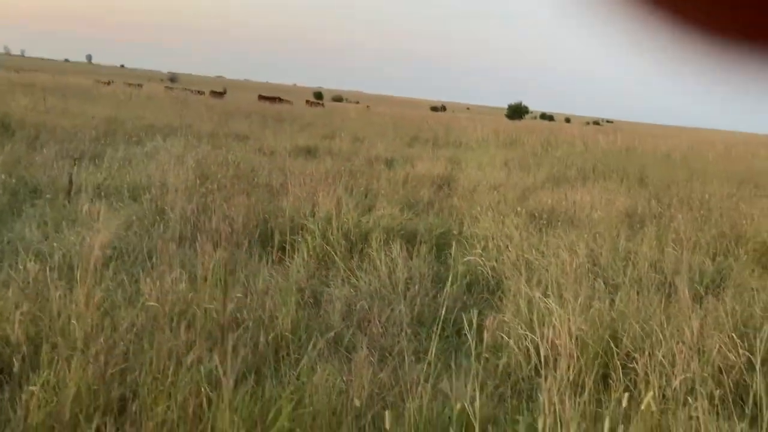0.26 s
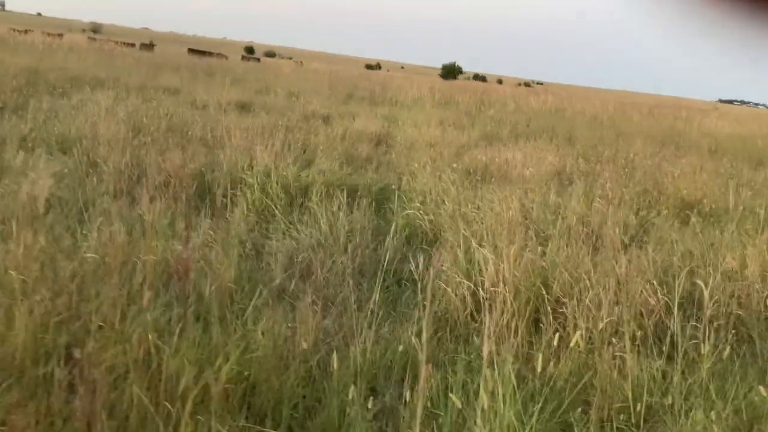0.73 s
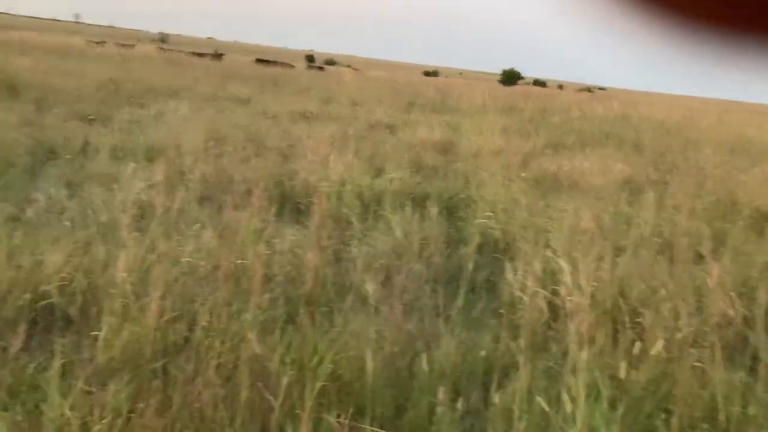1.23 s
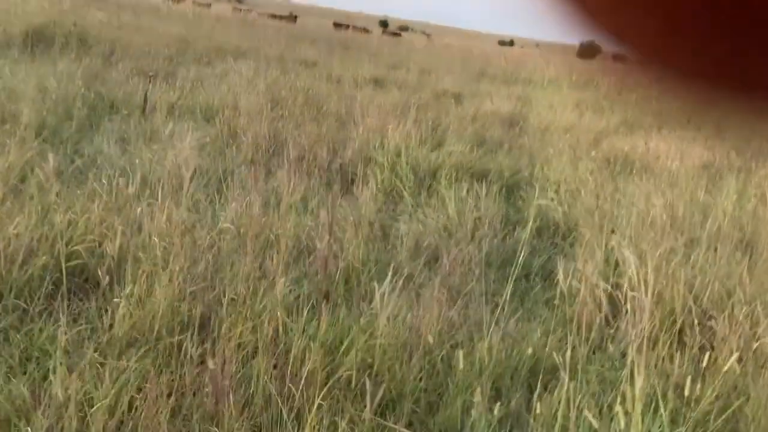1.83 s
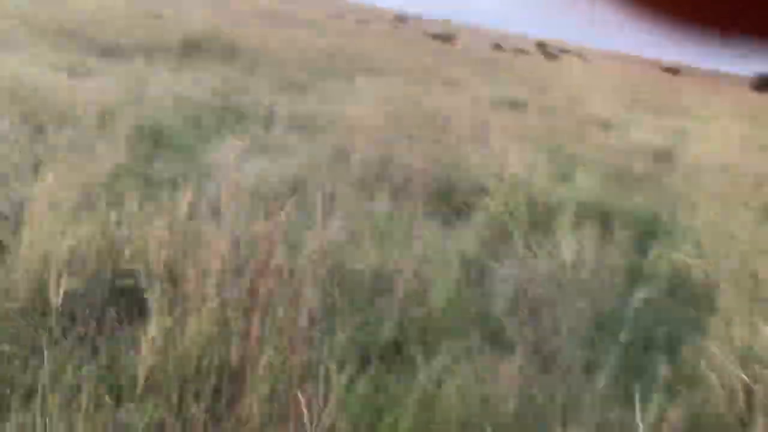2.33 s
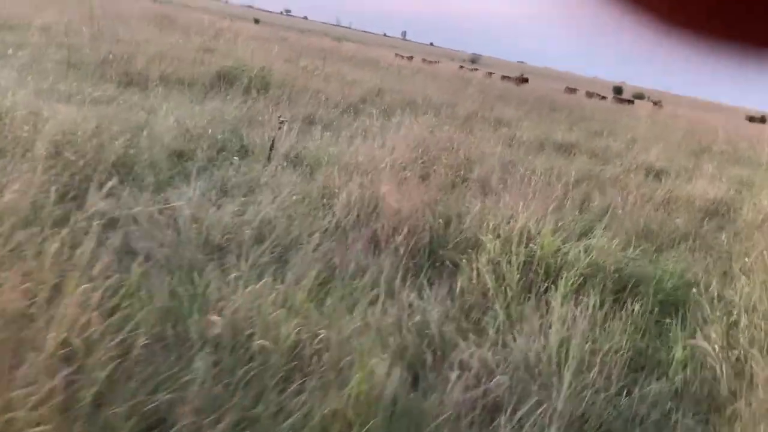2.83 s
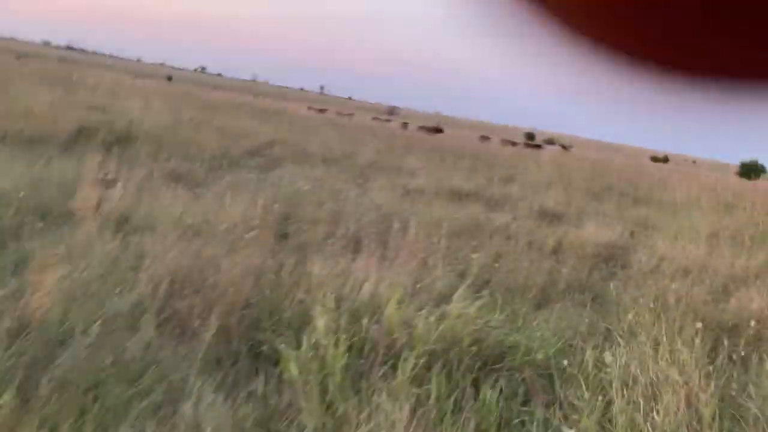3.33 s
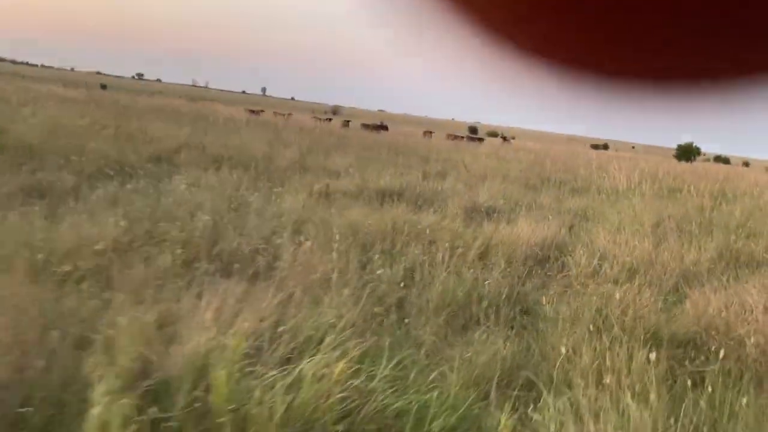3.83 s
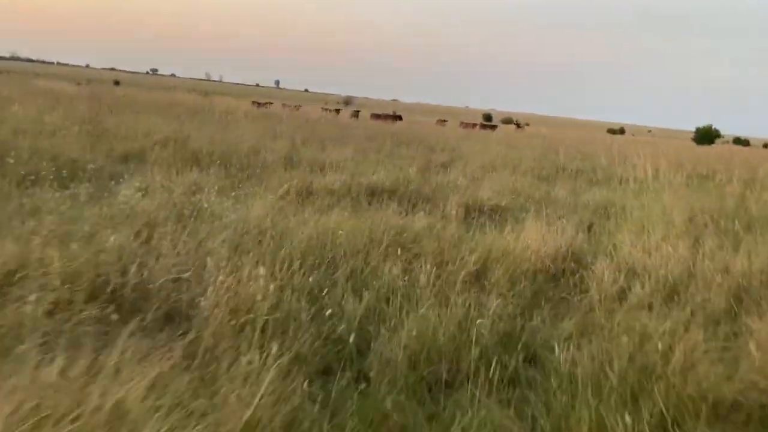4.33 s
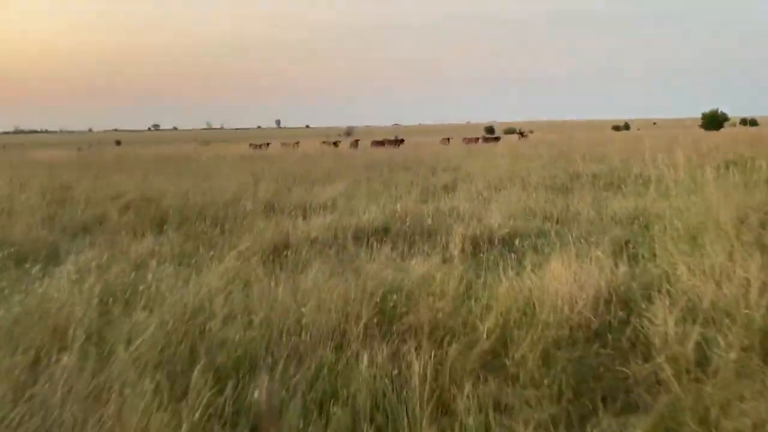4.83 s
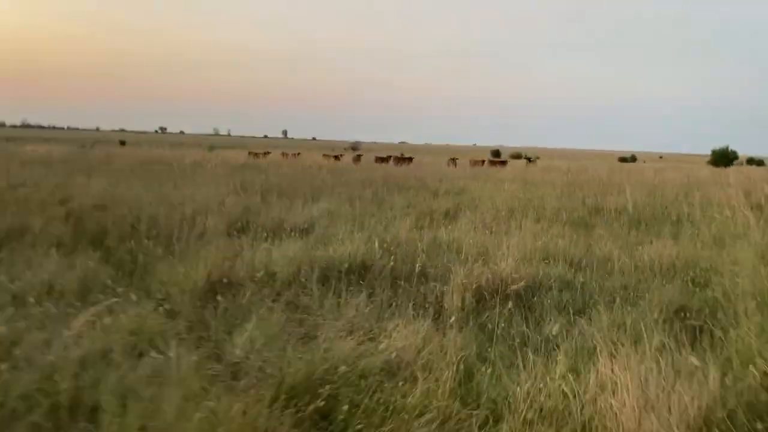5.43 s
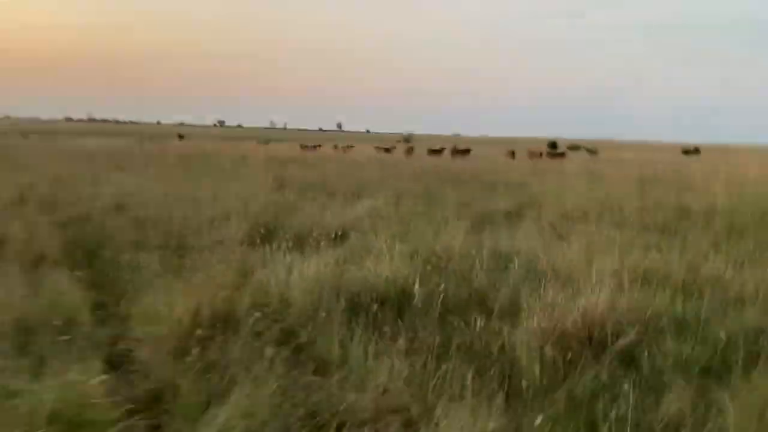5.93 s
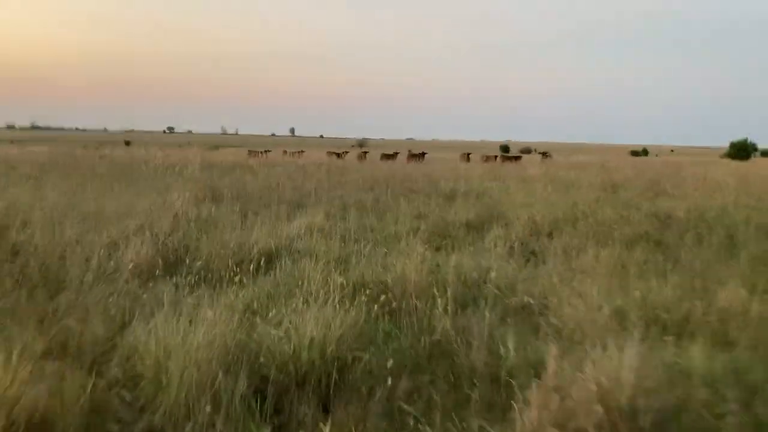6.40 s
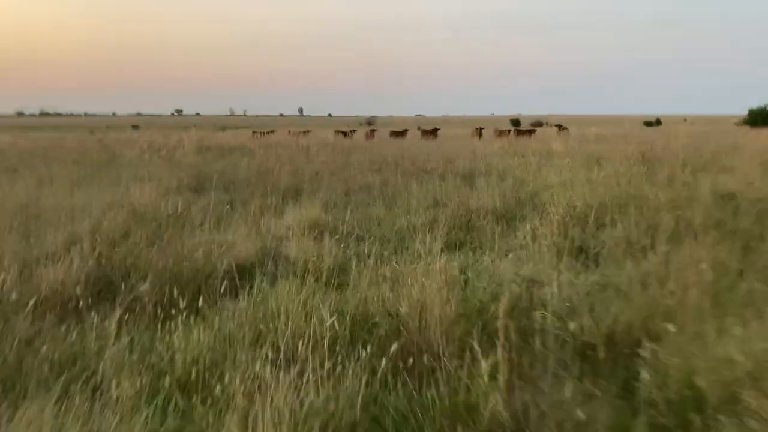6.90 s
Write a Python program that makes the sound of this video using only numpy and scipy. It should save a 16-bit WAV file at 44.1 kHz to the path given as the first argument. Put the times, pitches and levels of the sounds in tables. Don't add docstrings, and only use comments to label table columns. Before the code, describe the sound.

Close, chugging small engine revs and drives across rough pasture, with clattering metal, dry grass brushing the body, heavy jolts and bumping wind.

```python
import sys
import numpy as np
from scipy import signal
from scipy.fft import rfft, irfft, next_fast_len
from scipy.io import wavfile
from scipy.ndimage import uniform_filter1d

SR = 44100
rng = np.random.default_rng(int(sys.argv[2]) if len(sys.argv) > 2 else 0)


def dump_mix(stems):
    frames = np.atleast_2d(stems).T
    limited = np.clip(frames, -1, 1)
    pcm = np.round(limited * 32767).astype(np.int16)
    wavfile.write(sys.argv[1], SR, pcm)


def undo_db(level):
    steps = np.asarray(level, float) / 20
    return 10 ** steps


N = 315756

TIME = np.arange(N) / SR
SIZE = next_fast_len(N)
FREQ = np.fft.rfftfreq(SIZE, 1 / SR)
MID_REVS_HZ = 23
LEAD = np.exp(2j * np.pi * np.maximum(FREQ - 2640, 0) / 4400)


def unit(x):
    return x / np.sqrt(np.mean(x ** 2))


def curves(table):
    s, *columns = np.transpose(table)
    return [np.interp(TIME, s, c) for c in columns]


def across(table):
    hz, value = np.transpose(table)
    return np.interp(np.log(FREQ + 1), np.log(hz + 1), value)


def colour(x, gain):
    return irfft(rfft(x, SIZE) * gain, SIZE)[:N]


def shaped(x, table):
    return unit(colour(x, undo_db(across(table))))


def ring(x, hz, sharpness):
    return signal.lfilter(*signal.iirpeak(hz, sharpness, SR), x)


def bump(middle_s, half_s):
    return np.exp(-((TIME - middle_s) / half_s) ** 2)


def walk(rate):
    k = int(SR / rate)
    held = np.repeat(rng.standard_normal(N // k + 1), k)
    return unit(uniform_filter1d(uniform_filter1d(held, k), k)[:N])


def strokes(turns, early_s, scatter_db, jitter_s):
    cycle = np.arange(int(turns[-1]) + 2)
    size_chance, time_chance = rng.standard_normal((2, len(cycle)))
    at_s = np.interp(cycle, turns, TIME, left=-1, right=-1) - early_s + jitter_s * time_chance
    at = at_s * SR
    heard = (at > 0) & (at < N - 1)
    x = np.zeros(N)
    x[at[heard].astype(int)] = undo_db(scatter_db * size_chance[heard])
    return x


def ports(mono, other):
    # frequency in Hz, share of the sound common to both ports 0-1.
    likeness = [(300, 0.5), (900, 0.87), (1500, 0.54), (2400, 0.15), (5500, .6), (6800, .9), (9000, 1)]
    # frequency in Hz, left minus right in dB.
    balance = [(60, -1.5), (110, -1.5), (200, -11.5), (380, 6.5), (700, -2), (1290, 2), (2380, 2),
               (4400, 3.5), (8120, 0.5), (15000, -1)]
    like = np.clip(across(likeness), 0, 1)
    tilt = undo_db(across(balance) / 2)
    right = colour(mono, like * LEAD / tilt) + colour(other, np.sqrt(1 - like ** 2) / tilt)
    return np.array([colour(mono, tilt), right])


def wind(speed):
    # start in seconds, hold in seconds, level in dB.
    gusts = [(.22, .02, -32), (1.27, 0.017, -27.5), (1.584, 0.86, -28.5), (2.844, 0.055, -26),
             (3.089, 0.025, -26.5), (3.946, 0.021, -24), (4.685, .01, -25), (4.86, .02, -24),
             (4.913, 2.5, -27.5), (5.072, .012, -21.5), (5.143, 0.027, -18.5), (6.753, 0.065, -23.5),
             (6.904, .01, -24), (7.054, .01, -24.5)]
    # frequency in Hz, level in dB.
    buffet = [(20, -26), (40, -1), (100, 6), (200, 2), (400, 0.5), (700, -59)]
    rise_db_s, fall_db_s = 170, 190
    db = -54 + 5 * speed
    for s, hold_s, peak_db in gusts:
        before_s = np.maximum(s - TIME, 0)
        after_s = np.maximum(TIME - s - hold_s, 0)
        db = np.maximum(db, peak_db - rise_db_s * before_s - fall_db_s * after_s)
    eddies = [shaped(rng.standard_normal(N), buffet) * undo_db(1.5 * walk(30)) for _ in range(3)]
    rumble = 1 / (1 + (FREQ / 140) ** 4)
    upper = undo_db(1.3 * np.minimum(db + 22.5, 0))
    common, left, right = [colour(e, rumble) + upper * colour(e, 1 - rumble) for e in eddies]
    level = undo_db(-32.5 + 1.69 * (db + 31.5))
    return level * np.array([common + 0.61 * left, common + 1.17 * right])


def thicket():
    # frequency in Hz, level in dB.
    stem_colour = [(600, -30), (1100, -2), (1500, 6.5), (2600, -4), (3300, -13), (6000, -29)]
    swell = undo_db(-29.5) * bump(2.8, 0.45)
    stems = [rng.standard_normal(N) * undo_db(1.1 * walk(120)) for _ in range(2)]
    return ports(*[shaped(s, stem_colour) * swell for s in stems])


def grass(speed, turns):
    # frequency in Hz, level in dB.
    stalk_colour = [(2500, -53), (4000, 6), (5600, -5.5), (6800, -7), (9000, 1), (12000, -1.5),
                    (15000, -3.5), (15900, -9), (16100, -70)]
    # frequency in Hz, level in dB.
    seed_colour = [(9000, -26), (12000, -6), (14500, -1.5), (15900, -1), (16100, -60)]
    # middle in seconds, half length in seconds, extra level in dB.
    patches = [
        (2.65, 0.68, 25),
        (3.65, .3, 12),
        (4.5, 0.14, 18),
        (6.137, 0.4, 16),
    ]
    seed_db = -68.5 - 2 * speed
    for middle_s, half_s, extra_db in patches:
        seed_db = seed_db + extra_db * bump(middle_s, half_s)
    brush = undo_db(-49 + 4.5 * speed + 1.75 * walk(11))
    sides = []
    for _ in range(2):
        struck = rng.random(N) < 900 / SR
        ticks = struck * rng.standard_normal(N) * undo_db(5.0 * rng.exponential(size=N))
        sheet = rng.standard_normal(N) + 0.15 * unit(ticks)
        sides.append(shaped(sheet, stalk_colour) * brush + shaped(sheet, seed_colour) * undo_db(seed_db))
    throb = undo_db(0.84 * np.cos(2 * np.pi * (turns - .45)))
    return throb * ports(*sides)


def slaps(table, pan_db, sharpness, length_s, rise, strike):
    out = np.zeros((2, N))
    t = np.arange(int(.12 * SR)) / SR
    shape = np.minimum(t / (rise * length_s), 1) * np.exp(-t / length_s)
    bright_band = signal.butter(2, [3500, 15500], "band", fs=SR)
    for s, db, hz, bright_db in table:
        noise = rng.standard_normal((2, len(t))) * shape
        noise[:, int(rise * length_s * SR)] += strike
        tone = ring(noise, hz, sharpness)
        crack = signal.lfilter(*bright_band, noise)
        hit = tone / np.abs(tone).max() + undo_db(bright_db) * crack / np.abs(crack).max()
        hit[1] = .85 * hit[0] + .5 * hit[1]
        i = int(s * SR)
        out[:, i:i + len(t)] += hit * undo_db(db + np.array([[1], [-1]]) * pan_db[i] / 2)
    return np.array([out[0], colour(out[1], LEAD)])


def stalks_on_body(pan_db):
    # start in seconds, peak in dB, panel ring in Hz, brightness in dB.
    snaps = [(1.0164, -11, 2450, -16), (1.207, -20, 890, -14), (1.253, -14, 1850, -19),
             (1.307, -19, 1630, -21), (1.437, -21, 730, -20), (1.482, -23, 1190, -17),
             (1.677, -22.5, 1290, -15), (1.728, -20.5, 1360, -17), (3.3862, -19, 2140, -14),
             (5.8414, -16.5, 1210, -17), (5.8774, -25, 1420, -29)]
    cracks = [
        (0.599, -16, 2670, -10),
        (0.625, -7, 3350, 3.5),
        (1.0164, -16, 2500, -24),
        (1.3437, -15, 2420, -29),
        (2.8239, -11, 2250, -30),
        (3.2237, -16.5, 2500, -21),
    ]
    scrapes = [
        (1.067, -13.5, 915, -14),
        (1.25, -15, 1680, -32),
        (1.435, -26, 705, -15),
        (2.86, -15.5, 850, -32),
        (3.07, -10.5, 900, -38),
    ]
    fine_ticks = [
        (2.6703, -19, 11500, -8),
        (3.5638, -28, 14300, -12),
    ]
    side_db = 7.5 + 1.4 * pan_db
    hits = slaps(snaps, side_db, sharpness=11.6, length_s=.00414, rise=.1, strike=5)
    hits += slaps(cracks, side_db, sharpness=2.8, length_s=.0034, rise=.062, strike=.17)
    hits += slaps(scrapes, side_db, sharpness=1.4, length_s=.018, rise=.61, strike=0)
    hits += slaps(fine_ticks, side_db / 4, sharpness=3.3, length_s=.002, rise=.23, strike=1.9)
    return hits


def jolts():
    # start in seconds, peak in dB, thud in Hz.
    ruts = [
        (2.808, 5, 110.6),
        (3.09, -2, 124),
        (3.979, -7, 132),
        (4.688, -4, 98),
        (4.898, -14, 128),
        (5.061, -4, 88.8),
        (5.144, -17, 119),
        (5.268, -10, 146),
        (6.743, -6, 130),
        (6.794, -9, 124),
    ]
    out = np.zeros(N)
    t = np.arange(int(.1 * SR)) / SR
    for s, db, hz in ruts:
        swing = np.sin(2 * np.pi * hz * t) * np.exp(-t / 0.02)
        upper = 0.38 * np.sin(2 * np.pi * 2.51 * hz * t) * np.exp(-t / 0.0065)
        thud = swing + upper
        thud -= thud.mean() * np.hanning(len(t)) * 2
        i = int(s * SR)
        out[i:i + len(t)] += thud * undo_db(db - 7.5)
    return out


def clatter(hz, turns, opening, speed):
    # frequency in Hz, level in dB.
    casing = [(290, 0), (500, -5.5), (629, -7), (961, -1), (1080, -6.5), (1640, -9), (1910, -8),
              (3380, -20.5), (5680, -27.5), (7070, -22), (9000, -58), (11700, -65), (19800, -120)]
    # ring in Hz, width in Hz, level in dB,
    # favourite engine cycles per s, range in cycles per s.
    panels = [(884, 21.5, -14.5, 27, 2.6), (955, 40, -7.5, 27.5, 1.9), (1168, 11, -5.5, 18.1, 7.3),
              (1290, 95, -6, 22.3, 3.9), (1545, 16, -10.5, 32.1, 2.9), (1847, 21, -8, 23, 1.6),
              (2420, 460, -15.5, 22, 6.8), (3540, 77, -27.5, 28, 4), (4180, 360, -12.5, 20.3, 4.1),
              (4730, 80, -18, 12, 28), (6410, 320, -19.5, 36.7, 10), (7100, 170, -14, 42, 9.1)]
    # ring in Hz, width in Hz, level in dB.
    cover = [(966, 60, 1), (1350, 83, -8), (1957, 110, -3)]
    faster = hz - MID_REVS_HZ
    db = -34 + 2.5 * opening + .33 * faster + 1.5 * speed
    buzz_db = -7 + 3 * speed
    gate = 1 + 1.1 * np.exp(-((turns + .6) % 1) / .2) + .35 * np.exp(-((turns + .08) % 1) / .1)
    gate = uniform_filter1d(gate, size=220)
    sides = []
    for _ in range(2):
        habit = np.interp(turns % 1, np.linspace(0, 1, num=300), rng.standard_normal(size=300))
        shake = rng.standard_normal(N) + .22 * habit
        knocks = unit(shake * undo_db(1.1 * walk(260)) * gate)
        body = unit(colour(knocks, undo_db(across(casing)) * (FREQ > 450))) * undo_db(1.62 * walk(9))
        for ring_hz, width_hz, gain_db, best, span in panels:
            near = np.exp(-((hz - best) / span) ** 2 / 2)
            buzz = undo_db(gain_db + buzz_db + 1.8 * walk(6)) * near
            body = body + buzz * unit(ring(knocks, ring_hz, ring_hz / width_hz))
        sides.append(body * undo_db(db))
    taps = strokes(turns, early_s=.012, scatter_db=3.5, jitter_s=.0012)
    rap = unit(sum(undo_db(gain_db) * ring(taps, f_hz, f_hz / width_hz) for f_hz, width_hz, gain_db in cover))
    sides[0] = sides[0] + rap * undo_db(db - 13 + .8 * faster)
    return ports(*sides)


def intake(hz, turns, opening, boom_db):
    # frequency in Hz, level in dB.
    air_box = [(150, -9), (200, -9), (250, 6.5), (275, 4), (305, 3), (345, 4), (400, -1.5), (450, -9.5),
               (540, -49), (800, -41)]
    faster = hz - MID_REVS_HZ
    db = boom_db - 13.5 + 5 * opening + 0.41 * faster
    opening = np.clip(opening, 0, 1)
    opens = strokes(turns, early_s=.014, scatter_db=1, jitter_s=.0001)
    shuts = strokes(turns - .258, early_s=.014, scatter_db=1.2, jitter_s=.0001)
    fading = .65 * undo_db(-.4 * np.maximum(faster, 0))
    pulses = (opens + fading * shuts) / np.sqrt(hz)
    phase = np.exp(.8j)
    bark = opening * unit(colour(pulses, undo_db(across(air_box)) * phase))
    snap = unit(colour(opens, np.exp(-((FREQ - 450) / 60) ** 2) * phase))
    snap = snap * undo_db(-9 - 3 * np.maximum(faster, -2))
    bark = bark + opening ** 2 * snap
    breath = np.sqrt(1 - opening ** 2)
    rush = [breath * shaped(rng.standard_normal(N), air_box) for _ in range(3)]
    left = .75 * bark + .35 * rush[0] + .3 * rush[1]
    right = 1.15 * np.roll(bark, 8) + .4 * rush[0] + .4 * rush[2]
    return np.array([left, right]) * undo_db(db)


def exhaust(hz, turns, opening, db, pull_db, pan_db):
    # frequency in Hz, level in dB.
    silencer = [(16, -58), (33, -29), (44, -17.5), (56, -2), (66, -3), (90, -3), (110, -3.5), (132, 0.5),
                (143, -6.5), (152, -13), (162, -32), (190, -27)]
    faster = hz - MID_REVS_HZ
    coasting = np.clip((.35 - opening) / .1, 0, 1)
    third_db = -21 - faster + 22 * coasting
    skew_rad = 0.8 - 2.04 * opening + 0.067 * faster
    order = np.arange(1, 9)[:, None]
    edge_hz, pass_db = np.transpose(silencer)
    note_db = np.interp(np.log(order * hz), np.log(edge_hz), pass_db)
    note_db += pull_db * np.clip((order * hz - 92) / 40, 0, 1)
    note_db[2] += third_db
    size = undo_db(note_db + np.array([.8 * walk(9) for _ in order]))
    angle = 2 * np.pi * order * (turns + .004 * walk(14)) + skew_rad - .9 * (order == 2)
    steady = np.sqrt(np.sum(undo_db(note_db) ** 2, axis=0) / 2)
    boom = np.sum(size * np.cos(angle), axis=0) / steady * undo_db(db)
    delay_s = 0.00064 * np.maximum(-pan_db - 0.36, 0)
    late = np.interp(TIME - delay_s, TIME, boom)
    return np.array([boom * undo_db(pan_db / 2), late * undo_db(-pan_db / 2)])


def scene():
    # time in seconds, engine cycles per s.
    revs = [(0.0, 16.91), (0.042, 17.5), (0.333, 22.4), (0.568, 17.65), (0.713, 16.37), (1.034, 16.73),
            (1.445, 15.93), (1.863, 22.53), (2.159, 21.75), (2.641, 28.9), (2.977, 26.46), (3.243, 20.07),
            (3.511, 20.08), (3.822, 22.18), (4.203, 24.23), (5.479, 26.55), (6.105, 28.71), (7.16, 29.72)]
    # time in seconds, throttle opening 0-1, exhaust in dB, pull in dB.
    drive = [(0, 0.55, -17, -5), (.3, 0.39, -13.5, 4.5), (.5, 0.38, -19, -5), (.8, 0.33, -17.5, -8.5),
             (1.4, 0.61, -17.5, -7.5), (1.65, 0.62, -16.5, -0.5), (1.9, 0.92, -16, 9.5),
             (2.3, 0.67, -15, -0.5), (2.7, 0.86, -15, 7), (2.77, 0.2, -14.5, -2), (3.12, 0.2, -16.5, -1),
             (3.22, 0.75, -16, -3), (3.7, 0.72, -14, 1), (4.2, 0.71, -14.5, -2), (5.4, 0.82, -14.5, -1),
             (6, 1, -16, 8), (7.16, 0.43, -13, 2.5)]
    # time in seconds, ground speed in m per s.
    ground_speed = [(0, 0.5), (1.5, 0.55), (2.5, 1.5), (3.1, 0.9), (3.5, 1.5), (4.25, 2.26), (5.6, 2.64),
                    (5.95, 2.94), (7.16, 4.08)]
    # time in seconds, left minus right in dB.
    hand = [
        (0, -4),
        (1.3, -4.5),
        (1.9, -1.36),
        (7.16, -0.2),
    ]
    (hz,), (speed,), (pan_db,) = curves(revs), curves(ground_speed), curves(hand)
    opening, boom_db, pull_db = curves(drive)
    turns = .5 + np.cumsum(hz) / SR
    surroundings = wind(speed) + thicket() + grass(speed, turns)
    contact = stalks_on_body(pan_db) + jolts()
    engine = clatter(hz, turns, opening, speed) + intake(hz, turns, opening, boom_db)
    engine += exhaust(hz, turns, opening, boom_db, pull_db, pan_db)
    return surroundings + contact + engine


def low_pass(x):
    return signal.sosfilt(signal.butter(12, 16970, fs=SR, output="sos"), x)


def record(dry):
    rounded = np.tanh(0.6 * dry) / 0.61
    top_cut = signal.ellip(10, .2, 70, 16000, fs=SR, output="sos")
    return low_pass(signal.sosfilt(top_cut, rounded))


dry = scene()
out = record(dry)
dump_mix(out)
```